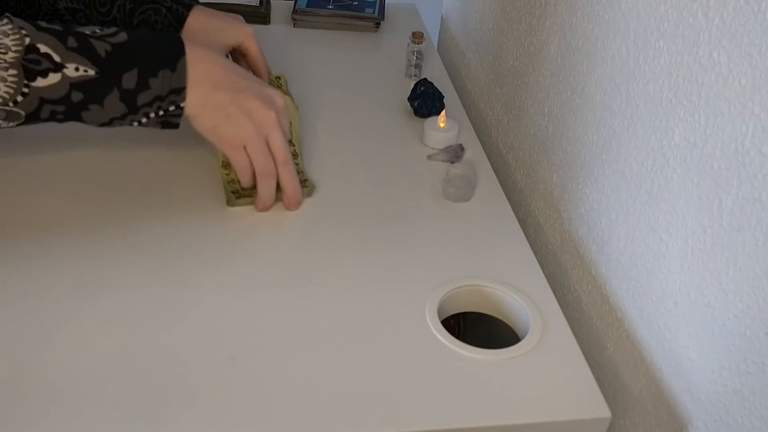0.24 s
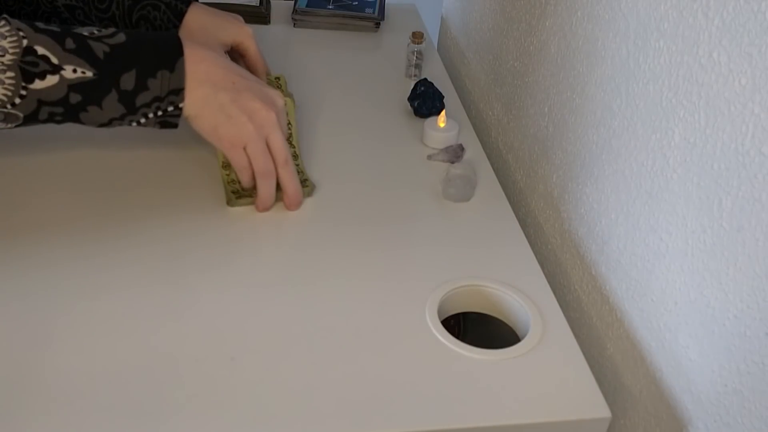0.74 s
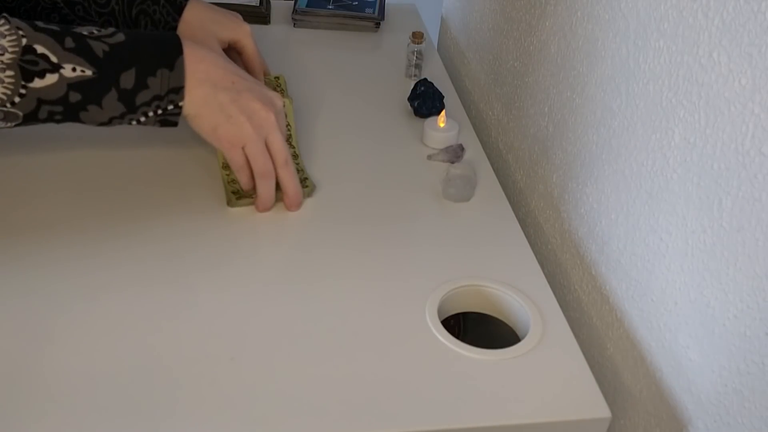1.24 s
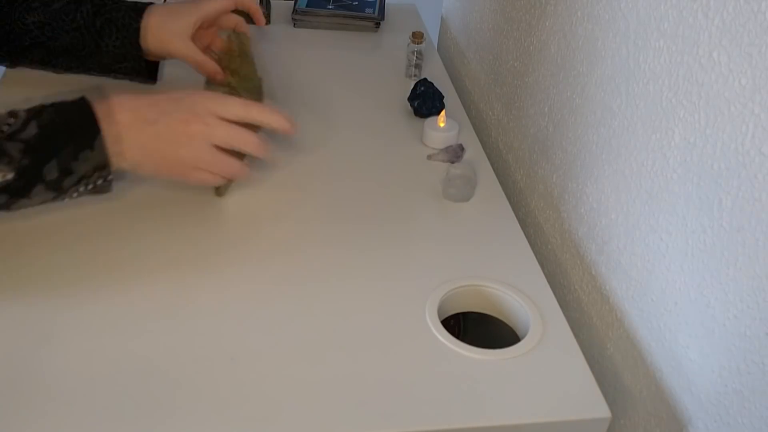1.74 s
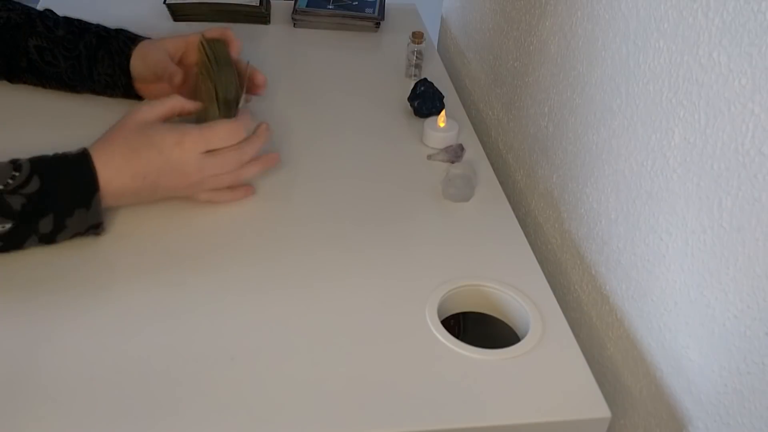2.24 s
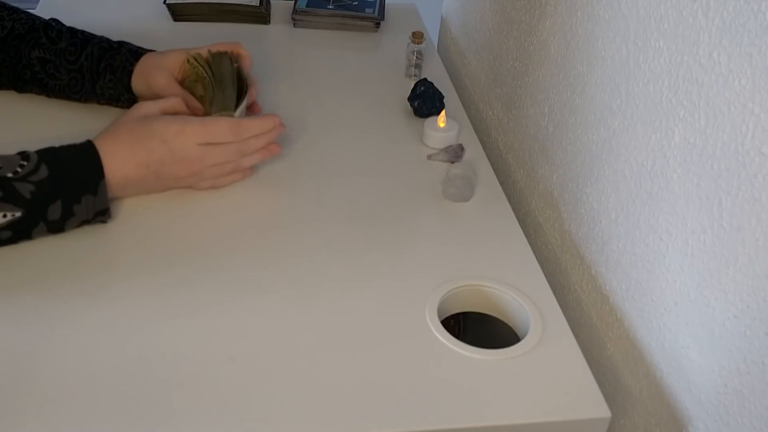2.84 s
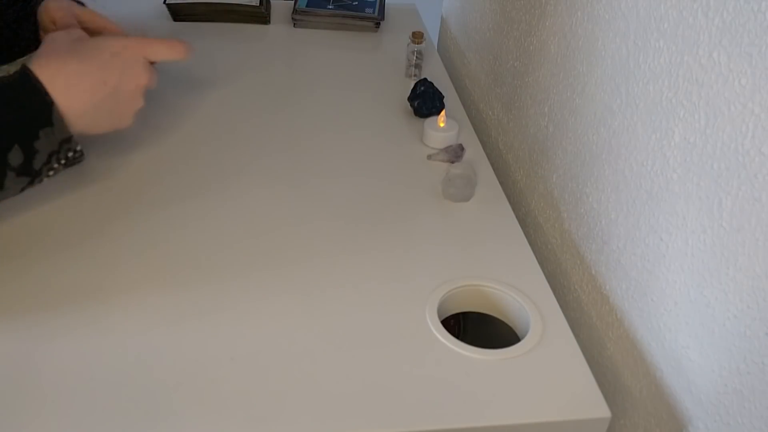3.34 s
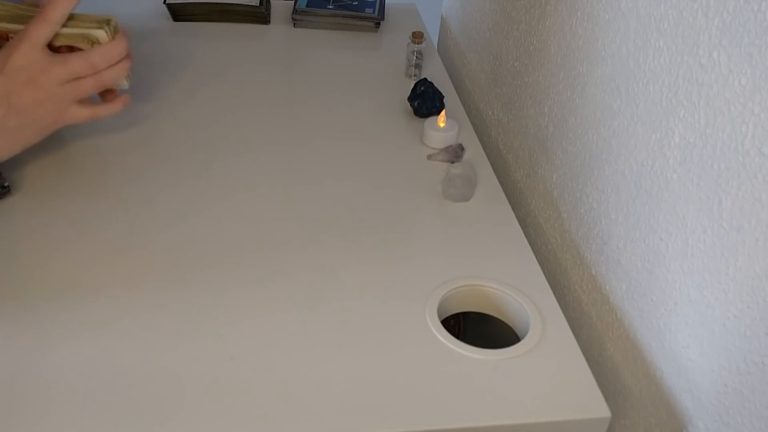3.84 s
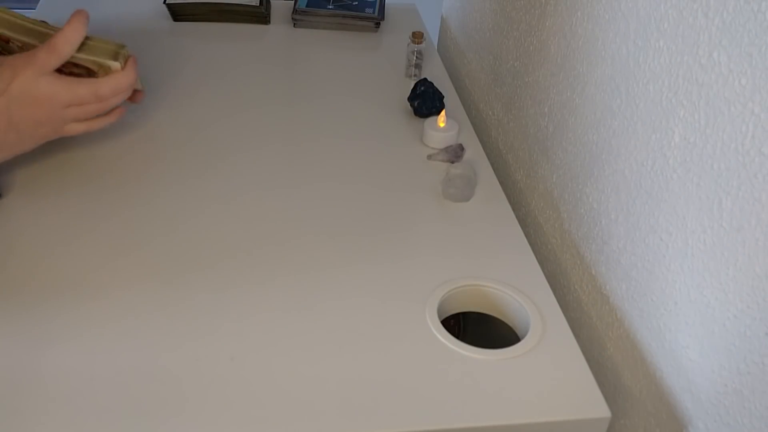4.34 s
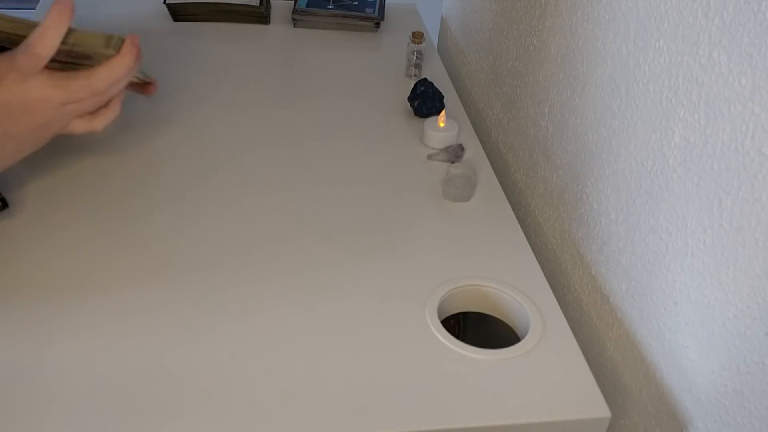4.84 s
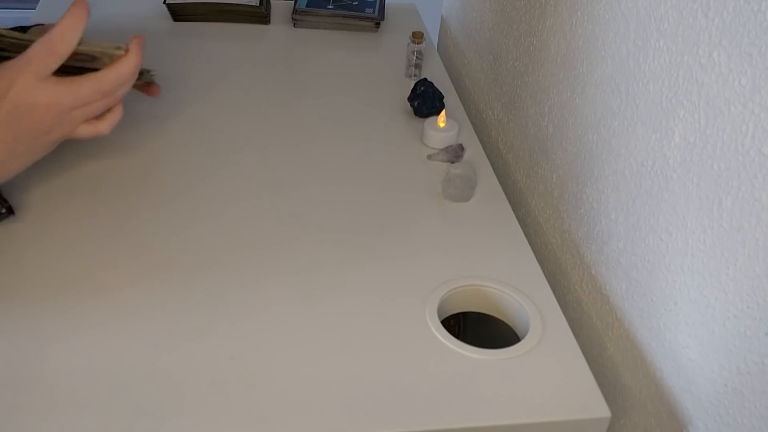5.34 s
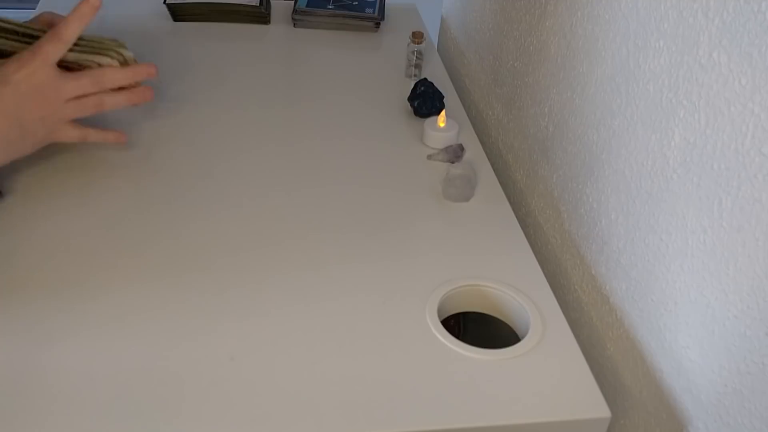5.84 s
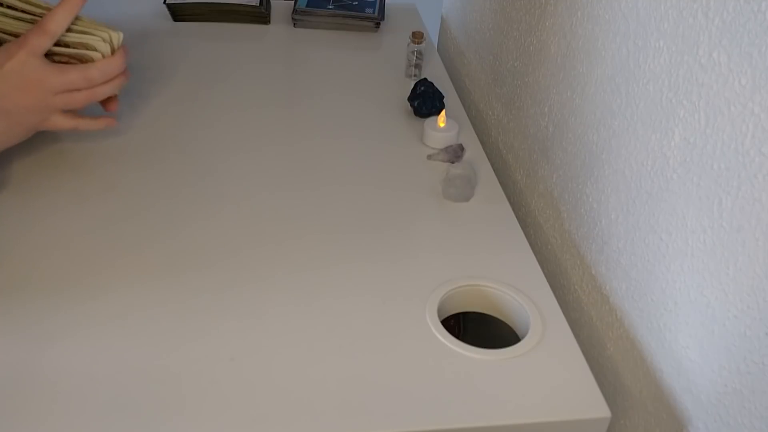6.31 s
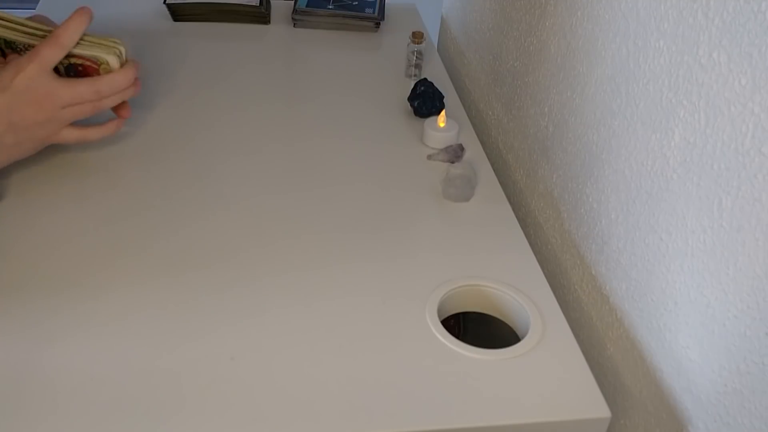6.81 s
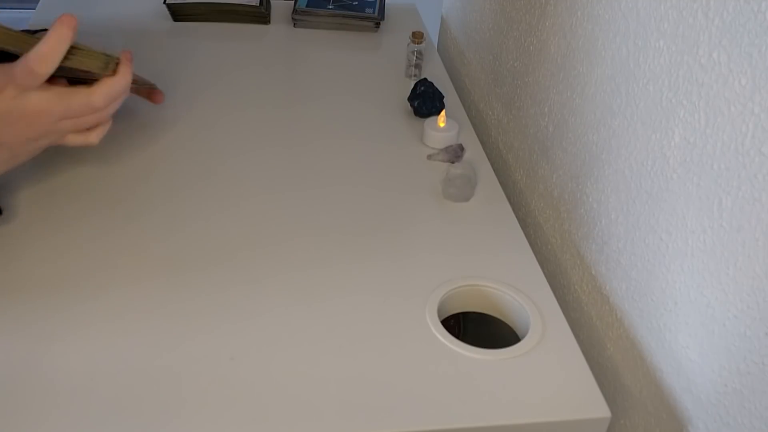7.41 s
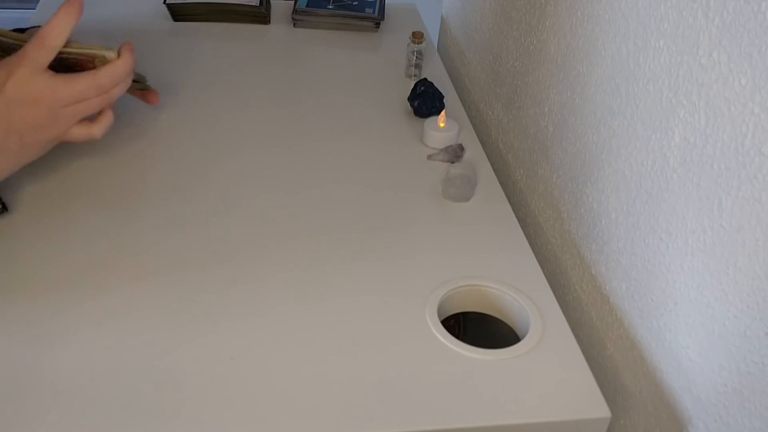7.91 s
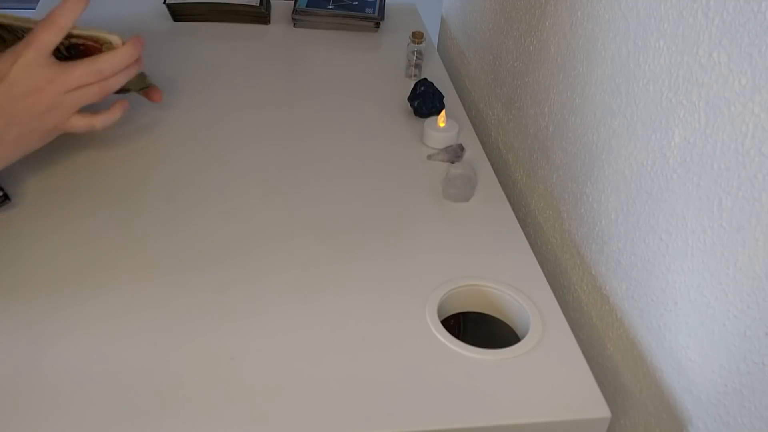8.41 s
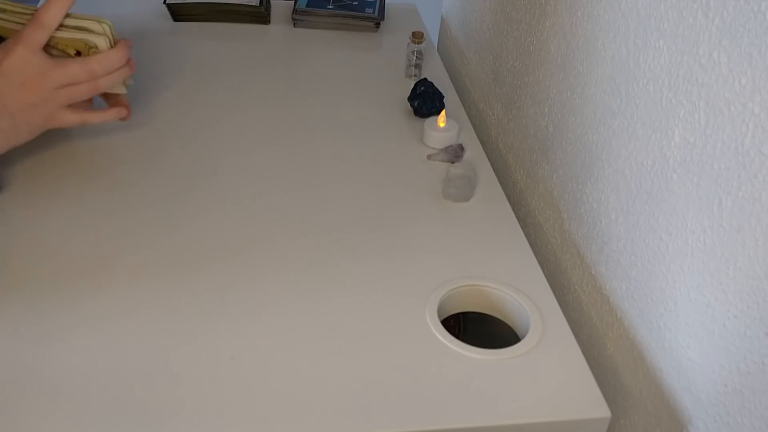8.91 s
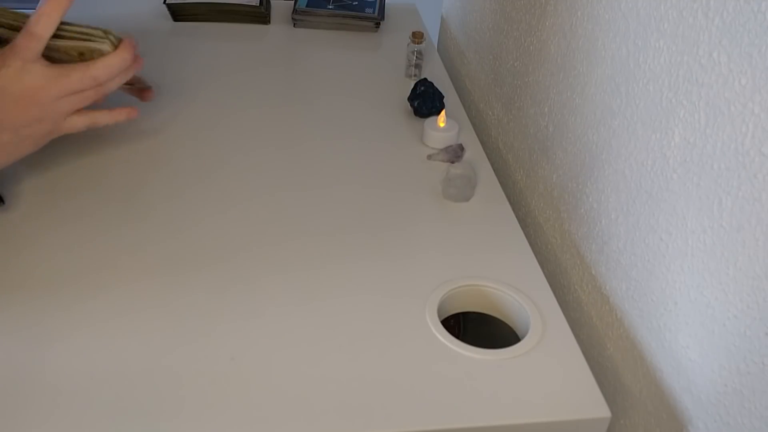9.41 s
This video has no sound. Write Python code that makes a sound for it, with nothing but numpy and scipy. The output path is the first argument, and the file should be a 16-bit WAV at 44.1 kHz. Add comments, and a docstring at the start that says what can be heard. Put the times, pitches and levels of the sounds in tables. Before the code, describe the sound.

Cards land hard on a desktop and snap off a thumb; edges knock and drag, then packets slide and slap in the hands.

```python
"""Shuffling a deck of cards

A deck lands on a desk in a small, quiet room, its cards flick off the thumb and its edge is knocked and
dragged square; it is then shuffled overhand, packets sliding out and slapping into the other hand.
Impacts are shaped noise bursts (snap, clap, thump), slides are modulated friction noise and drags are
stick-slip pulse trains. Desk modes and diffuse reflections surround them, over rumble, hum and hiss."""
import sys
import numpy as np
from scipy import signal
from scipy.fft import rfft, irfft
from scipy.io import wavfile
from scipy.ndimage import uniform_filter1d

SR = 44100
rng = np.random.default_rng(int(sys.argv[2]) if len(sys.argv) > 2 else 0)


def log_audio(samples):
    """Write samples as a 16-bit WAV file to the path given in sys.argv[1]."""
    # one column per channel
    frames = np.atleast_2d(samples).T
    # limit to full scale, then quantise
    limited = np.clip(frames, -1, 1)
    pcm = np.round(limited * 32767).astype(np.int16)
    wavfile.write(sys.argv[1], SR, pcm)


N = 426006
TIME = np.arange(N) / SR

# Cards flicking off the thumb onto the pile:
# (time [s], clap level before gain [dB], edge snap re clap [dB], contact time scale [ms])
FLICKS = [(0.3264,-14,3.5,1.7), (0.4745,-22.5,1.5,1.8), (.4916,-26.5,9.5,0.92), (0.511,-27.5,1,1.3),
          (0.5277,-25.5,5,2.6), (0.5648,-25.5,5.5,2.2), (.596,-30,6,2.4), (0.6033,-20,9.5,4),
          (0.6107,-20,3,2.2), (0.6202,-21.5,3.5,1.9), (0.6401,-26,4.5,4.5), (0.717,-18,-3,3.6),
          (0.7699,-17.5,-3.5,2.5), (0.7858,-15.5,1.5,6.8), (0.8008,-21,3.5,0.55), (0.8779,-19.5,-3,2.7),
          (0.8818,-28.5,10,7.6), (.9,-23,-3.5,2), (0.9115,-16,-8.5,3.7), (1.0025,-19.5,1.5,3),
          (1.0223,-26.5,-1.5,9.8), (1.0308,-25,9.5,2.9), (1.046,-23.5,4.5,3.7), (1.0622,-21.5,2,3.2),
          (1.1196,-22.5,4.5,4.2), (1.1281,-21,2.5,2.8), (1.2464,-20.5,0.5,5.8), (1.267,-20.5,7.5,5),
          (1.3652,-16.5,4.5,5.2), (1.3842,-24,5.5,2.8), (1.4049,-19.5,4,4.7), (1.4118,-24,8,2.7),
          (1.5111,-26.5,6,3.2), (1.5298,-18,8,1.8), (1.5385,-19.5,3,2.7)]
# Overhand strokes, a packet slapping into the hand, sliding, and its last card springing free:
# (slap time [s], release time [s], lead of first touch [ms], slap level before gain [dB],
#  air thump re slap clap [dB], slide level before gain [dB], release level before gain [dB],
#  release snap re clap [dB])
STROKES = [(4.743,4.842,1.1,-26,-10,-47.5,-32.5,3.5), (4.999,5.1023,3,-24,-11,-46,-29,-4.5),
           (5.301,5.376,15.8,-34,-0.5,-47.5,-24.5,-1.5), (5.58,5.6674,7.2,-33.5,6.5,-46.5,-35.5,-15),
           (7.313,7.4633,5.9,-21.5,-8.5,-45.5,-34,-20), (7.619,7.7108,12.4,-28.5,-4,-44,-26.5,0),
           (7.9257,8.0144,19,-36.5,-1.5,-47.5,-31.5,0.5), (8.2284,8.3108,6.5,-30,0.5,-45.5,-34,8.5),
           (8.52,8.584,12.5,-37.5,-1,-46,-48,-2), (9.523,9.6407,0.96,-27,0,-50,-29,-4.5)]
SETTLE_S = 0.017  # from the release until the freed packet falls against the others
# Spectrum of card faces rubbing: (frequency [Hz], relative level [dB])
SLIDE_TONE = [(59, -30.5), (100, -11.5), (322, 2), (442, -5), (1130, -2.5), (1520, 1), (2630, -8.5),
              (6840, -12.5), (11400, -15), (16000, -25)]


def undb(db):
    """An amplitude ratio is ten to the power of its level in decibels over twenty."""
    return 10 ** (np.asarray(db) / 20)


def unit(x):
    """Normalise a transient to unit energy, the sum of its squares."""
    return x / np.sqrt(np.sum(x ** 2) + 1e-18)


def steady(x):
    """Normalise a fluctuating signal by its standard deviation."""
    return x / np.std(x)


def add(out, s, x):
    """Superpose x on out from time s [s], in place."""
    i = int(np.clip(s * SR, 0, N - 1))
    out[i:i + len(x)] += x[:N - i]


def at_hz(points, hz):
    """Interpolate a tabulated curve linearly in log frequency."""
    f, v = np.transpose(points)
    return np.interp(np.log(np.maximum(hz, 1)), np.log(f), v)


def colour(x, tone, size=2048):
    """Minimum-phase filtering: folding the cepstrum makes the response to a spectrum causal."""
    log_gain = np.log(undb(at_hz(tone, np.fft.rfftfreq(size, 1 / SR))))
    cepstrum = irfft(log_gain)
    cepstrum[1:size // 2] *= 2
    cepstrum[size // 2 + 1:] = 0
    response = unit(irfft(np.exp(rfft(cepstrum))))
    return signal.fftconvolve(x, response)[:len(x)]


def band(x, lo_hz, hi_hz, order=2):
    """Butterworth band-pass: maximally flat between its corner frequencies."""
    corners = [lo_hz, min(hi_hz, .45 * SR)]
    return signal.sosfilt(signal.butter(order, corners, "band", fs=SR, output="sos"), x)


def waver(rate):
    """Random finger pressure: Gaussian values, rate per second, joined by straight lines; spread near 1."""
    return 1.2 * np.interp(TIME * rate, np.arange(8000), rng.standard_normal(8000))


def friction(rate, spread_db, smooth):
    """Dry friction: fibres catch and let go in tiny clicks of uneven size, over a smooth hiss."""
    sizes = undb(spread_db * np.minimum(rng.standard_exponential(N), 4))
    catches = (rng.random(N) < rate / SR) * sizes * rng.choice([-1, 1], N)
    return steady(steady(catches) + smooth * rng.standard_normal(N))


def air(hum_hz, hum_db):
    """Stationary background: low room rumble and microphone hiss as shaped noise, a faint hum as a sine."""
    # Background spectrum: (frequency [Hz], relative level [dB])
    air_tone = [(12, -34), (20, 1.5), (120, -16.5), (472, -28.5), (558, -25), (849, -32.5), (1090, -29),
                (1220, -34.5), (1440, -34), (16000, -39)]
    noise = steady(colour(rng.standard_normal(N), air_tone, size=8192))
    hum = np.sin(2 * np.pi * hum_hz * TIME)
    return undb(-54) * noise + undb(hum_db) * hum


def blow(tone, snap_db, thump_db, ms, clap_s, thump_s, flutter, crisp, count=3000):
    """Impact in three bands: edges snap in a brief contact, the pack claps and flutters, trapped air thumps."""
    t = TIME[:count]
    edge_noise, pack_noise, air_noise = rng.standard_normal((3, count))
    u = t / (max(ms, .3) / 1000)
    contact = np.sqrt(u) * np.exp(-(crisp * u) ** 2)
    # loose cards tick against each other just after the contact
    loose = (rng.random(count) < 900 / SR) * edge_noise * np.exp(-t / .014)
    edges = edge_noise * contact + .5 * loose
    pack = pack_noise * (contact + flutter * np.exp(-t / clap_s))
    trapped_air = air_noise * np.exp(-t / thump_s)
    snap = band(colour(edges, tone), 2500, 19000)
    clap = band(colour(pack, tone), 400, 2500)
    thump = band(colour(trapped_air, tone), 30, 400)
    return unit(clap) + undb(snap_db) * unit(snap) + undb(thump_db) * unit(thump)


def blows(rows, tone, gain_db, echo_db, clap_s, thump_s, flutter, crisp):
    """Early reflection: desk and wall return each blow, with two delays drawn anew every time."""
    out = np.zeros(N)
    # rows: (time [s], clap level before gain [dB], snap re clap [dB], thump re clap [dB], contact [ms])
    for s, db, snap_db, thump_db, ms in rows:
        sound = undb(db + gain_db) * blow(tone, snap_db, thump_db, ms, clap_s, thump_s, flutter, crisp)
        add(out, s, sound)
        for delay in rng.uniform([.003, .007], [.007, .012]):
            add(out, s + delay, undb(echo_db) * sound)
    return out


def landing():
    """Flat impact: the deck meets the desk in two close blows and presses out the air below."""
    # Blows of the landing: (time [s], clap level before gain [dB], edge snap re clap [dB],
    # air thump re clap [dB], contact time scale [ms])
    landing_rows = [(.2875,-0.5,-9.5,-13.5,2.7), (.2907,-13,-21.5,-7.5,2.6)]
    # Spectrum of the landing: (frequency [Hz], relative level [dB])
    landing_tone = [(60,-13), (200,-12), (400,-0.5), (700,-5.5), (1050,-0.5), (1600,-6), (2300,-14.5),
                    (2900,-6), (4000,-19.5), (8000,-23.5), (16000,-40)]
    return blows(landing_rows, landing_tone, gain_db=20, echo_db=-22, clap_s=0.0076, thump_s=0.0066,
                 flutter=.25, crisp=0.83)


def desk(force):
    """Modal synthesis: the force is convolved with a sum of decaying sines, the modes of the desk top."""
    # Modes of the desk top: (frequency [Hz], relative level [dB], 60 dB decay time [s])
    desk_modes = [(96.7, -12, 0.21), (490, -11.5, .1), (580, -9, 0.16), (752, -6, 0.2), (850, -12, 0.092),
                  (1058, 4.5, .16), (1420, -4.5, 0.088), (1860, -7, 0.031), (1975, 0.5, 0.083),
                  (2890, -7, .04)]
    t = TIME[:SR // 2]
    ring = np.zeros(len(t))
    for hz, db, t60 in desk_modes:
        ring += undb(db) * np.sin(2 * np.pi * hz * t) * np.exp(-np.log(1000) * t / t60)
    return signal.fftconvolve(force, unit(ring))[:N]


def reflections(wet_db, build_s):
    """Diffuse reverberation: noise builds up, then decays exponentially at a rate set by frequency."""
    # Room decay: (frequency [Hz], 60 dB decay time [s])
    room_t60 = [(100, 0.68), (700, 0.2), (2000, 0.25), (6000, 0.22), (15000, 0.23)]
    # Spectrum of the reflections: (frequency [Hz], relative level [dB])
    room_tone = [(60, -5.5), (200, -7.5), (600, 5), (1500, -0.5), (4000, 0), (9000, -4), (16000, -1.5)]
    t = TIME[:SR // 2]
    noise = rfft(rng.standard_normal(len(t)))
    hz = np.fft.rfftfreq(len(t), 1 / SR)
    tail = 0
    for k, (_, t60) in enumerate(room_t60):
        # overlapping bands, each full at its own frequency and zero at its neighbours'
        share = at_hz([(f, j == k) for j, (f, _) in enumerate(room_t60)], hz)
        tail = tail + irfft(noise * share, len(t)) * np.exp(-np.log(1000) * t / t60)
    build_up = 1 - np.exp(-(t / build_s) ** 2)
    return undb(wet_db) * unit(colour(tail * build_up, room_tone))


def room(x, wet_db, build_s, count=4):
    """Changing reflections: hands move, so successive short slices of sound take different random tails."""
    turn = np.arange(N) // 600 % count
    wet = 0
    for k in range(count):
        slices = uniform_filter1d(1. * (turn == k), size=64)
        wet = wet + signal.oaconvolve(x * slices, reflections(wet_db, build_s))[:N]
    return x + wet


def handling(patchy_db, fidget_db):
    """Modulated friction: patchy rustle swells as cards peel off the thumb, later as fingers move on the deck."""
    peel_s, peel_db = 0.025, -31.5  # length before each flick; level relative to its clap before gain
    rustle = steady(colour(friction(rate=1200, spread_db=3, smooth=.8), SLIDE_TONE))
    peeling = np.zeros(N)
    for s, db, _, _ in FLICKS:
        add(peeling, s - peel_s, undb(db + peel_db) * np.linspace(0, 2, int(peel_s * SR)) ** 2)
    # fingers never rest on the lifted deck, from 3.1 s on
    holding = undb(-78.5 + fidget_db * waver(4.4)) * (TIME > 3.1)
    return rustle * undb(patchy_db * np.tanh(waver(33))) * (peeling + holding)


def flick_blows():
    """Air cushion: every flick squeezes out about the same thump, however hard; a weaker card trails it."""
    cushion_db = -24.5  # thump level before gain
    straggler_db, straggler_s = -14, .014  # level relative to the flick; longest delay
    for (s, db, snap_db, ms), late in zip(FLICKS, rng.uniform(.2, 1, len(FLICKS))):
        yield s, db, snap_db, cushion_db - db, ms
        yield s + late * straggler_s, db + straggler_db, 0, 0, ms


def flicks():
    """Impact of light plates: single cards strike the pile with strong edge snaps."""
    # Spectrum of the flicks: (frequency [Hz], relative level [dB])
    flick_tone = [(35,-25), (90,4.5), (170,-9), (300,-4), (600,-5), (1100,-4), (1700,-5.5), (2300,-10),
                  (2900,-5), (3900,-13), (5500,-9), (11000,-13.5), (16000,-23)]
    return blows(flick_blows(), flick_tone, gain_db=21, echo_db=-15.5, clap_s=0.011, thump_s=0.0044,
                 flutter=0.33, crisp=1.3)


def knock_blows():
    """Level-dependent spectrum: light knocks are mostly thump, hard ones mostly clap."""
    # Deck edge knocking on the desk:
    # (time [s], clap level before gain [dB], edge snap re clap [dB])
    knock_rows = [(.4393,-38,-8), (1.2157,-35.5,-1), (1.622,-38,-15.5), (1.8544,-44.5,-20),
                  (1.9681,-35,-12.5), (1.9946,-31,-24), (2.033,-20.5,3.5), (2.063,-24.5,-21),
                  (2.0894,-17.5,-9.5), (2.11,-8.5,-4), (2.217,-27,-34), (2.2416,-35,-27.5), (2.272,-26,-26),
                  (2.4717,-24,-16.5), (2.6222,-10,-1), (2.675,-21.5,-7), (2.753,-22.5,-11),
                  (2.7913,-11,-7.5), (3.0229,-30,0), (3.042,-33,-2.5)]
    thump_at_0_db, thump_growth = -25, 0.2  # thump of a 0 dB clap [dB]; its rise per dB of clap
    for s, db, snap_db in knock_rows:
        thump_db = thump_at_0_db + thump_growth * db
        yield s, db, snap_db, thump_db - db, 3.2


def knocks():
    """Edge impact: the deck strikes the desk, with a long thump and strong flutter."""
    # Spectrum of the knocks: (frequency [Hz], relative level [dB])
    knock_tone = [(50,-25), (90,-9.5), (170,-15.5), (400,-7.5), (750,-4.5), (1050,-0.5), (1500,-2.5),
                  (2100,-9.5), (3200,-17), (4300,-20.5), (5500,-27.5), (10000,-36.5), (16000,-53)]
    return blows(knock_blows(), knock_tone, gain_db=21.5, echo_db=-20, clap_s=0.0063, thump_s=0.027,
                 flutter=0.72, crisp=0.72)


def drags(gain_db, jitter, scatter_db, hiss, count=120):
    """Stick-slip: card edges judder over the desk in nearly regular pulses, with a little hiss between."""
    # Card edges dragged over the desk:
    # (start [s], length [s], level before gain [dB], nominal slip rate [1/s])
    drag_rows = [(1.821,0.034,-50.5,94), (1.907,0.025,-48,130), (1.986,0.044,-44,126),
                 (2.047,0.093,-34.5,270), (2.194,0.23,-48,160), (2.426,0.049,-27,270),
                 (2.567,0.062,-26,250), (2.646,.05,-36,270), (2.736,0.022,-22.5,330), (2.761,0.032,-30,270),
                 (3.014,0.023,-35,310)]
    # Spectrum of the drags: (frequency [Hz], relative level [dB])
    drag_tone = [(100,-25), (400,-17.5), (700,-1.5), (1000,-5), (1400,-5), (2100,-10.5), (2800,-28),
                 (5000,-30), (15000,-48)]
    rise_db = 6.5  # the hand presses harder along a drag
    out = np.zeros(N)
    for start, length, db, rate in drag_rows:
        gaps, sizes = rng.standard_normal((2, count))
        force = hiss * rng.standard_normal(SR // 2)
        slip_s = np.cumsum(np.exp(jitter * gaps) / rate)
        where = (slip_s * SR).astype(int)
        inside = where < len(force)
        force[where[inside]] += undb(scatter_db * sizes[inside])
        force = steady(force[:max(int(length * SR), 256)])
        press_db = rise_db * np.linspace(-.5, .5, len(force))
        add(out, start, force * undb(gain_db + db + press_db))
    return colour(out, drag_tone)


def sliding(fade_s):
    """Friction grows with speed: even gain through a stroke, swelling and stopping in a slow slide."""
    # Card faces drawn over each other in slow slides, mostly outside the strokes:
    # (start [s], length [s], peak level before smoothing and gain [dB])
    slide_rows = [(2.17,0.16,-47), (2.276,0.15,-44), (2.962,0.11,-46.5), (3.04,0.25,-53), (3.364,0.2,-58),
                  (3.874,0.044,-58), (3.956,.11,-62.5), (4.324,0.25,-48.5), (4.644,0.091,-42.5),
                  (5.825,.12,-59.5), (6.184,0.23,-53), (6.432,0.16,-59), (6.712,0.066,-68.5),
                  (6.973,.22,-51), (8.761,0.17,-58), (8.891,0.13,-55.5), (9.06,.15,-60), (9.206,0.19,-44),
                  (9.586,0.082,-43)]
    peak_share, power = 0.7, 0.99  # share of the slide spent gathering speed; gain per speed exponent
    gain = np.zeros(N)
    for s, release_s, lead_ms, _, _, db, _, _ in STROKES:
        touch_s = s - lead_ms / 1000
        length = max(release_s + SETTLE_S - touch_s, 0)
        add(gain, touch_s, np.full(int(length * SR), undb(db)))
    for s, length, db in slide_rows:
        along = np.linspace(0, 1, int(length * SR))
        speed = np.interp(along, [0, min(peak_share, 1), 1], [0, 1, 0])
        add(gain, s, undb(db) * speed ** power)
    return uniform_filter1d(gain, max(int(fade_s * SR), 1))


def slides(hiss_db, rub_db):
    """Sliding friction in two bands: card faces hiss unevenly, the packet in the hand rubs lower."""
    grain = colour(friction(rate=1200, spread_db=4.0, smooth=1.2), SLIDE_TONE)
    hiss = steady(band(grain, 2500, 19000))
    rub = steady(band(grain, 120, 2500))
    uneven_hiss = undb(hiss_db + 2.9 * waver(86)) * hiss
    uneven_rub = undb(rub_db + 5.2 * waver(90)) * rub
    return (uneven_hiss + uneven_rub) * sliding(fade_s=.009)


def hand_blows():
    """Impact sequence: every stroke goes grip, touch, slap, release, settle; single taps are added."""
    # Packets tapping together as the deck is regripped:
    # (time [s], clap level before gain [dB], edge snap re clap [dB], air thump re clap [dB])
    tap_rows = [(3.1424,-35,1,-9), (3.5264,-39.5,4,7), (4.0828,-61,6,5), (4.1022,-55.5,4,8.5),
                (4.4717,-49,1,4), (4.52,-34.5,-7,-6), (4.6419,-29.5,-3,-22), (5.075,-35,4.5,1),
                (5.4356,-36,-15,1), (6.2687,-54.5,8.5,16), (7.086,-44.5,4,-13), (7.1587,-38.5,-3.5,1.5),
                (7.381,-35,-3,5), (8.588,-35.5,0,5.5), (9.604,-35.5,4,-5)]
    touch_snap_db, release_thump_db = 3, -8.5  # relative to their claps
    for s, release_s, lead_ms, db, thump_db, _, release_db, snap_db in STROKES:
        # the thumb ticks on the deck, then the leading card touches the hand
        yield s - .073, -60, touch_snap_db, release_thump_db, 2.8
        yield s - lead_ms / 1000, db - 7.5, touch_snap_db, thump_db, 1.5
        yield s, db, 0.5, thump_db, 1.42
        # the last card springs free, then the freed packet falls against the others
        yield release_s, release_db, snap_db, release_thump_db, 2.2
        yield release_s + SETTLE_S, release_db - 5.5, snap_db, release_thump_db, 2
    for tap in tap_rows:
        yield *tap, 1.85


def slaps():
    """Impact on a soft support: packets slap into the hand and their claps flutter on."""
    # Spectrum of the slaps: (frequency [Hz], relative level [dB])
    slap_tone = [(30,-6.5), (60,4), (150,-2.5), (330,-4), (600,-5), (1100,-5), (1800,-4), (3000,-9.5),
                 (4700,-5), (12000,-14), (16000,-20.5)]
    return blows(hand_blows(), slap_tone, gain_db=22.0, echo_db=-16.0, clap_s=0.018, thump_s=0.0048,
                 flutter=0.47, crisp=0.81)


def rasps(gain_db):
    """Band-limited noise: a band-pass around one pitch turns friction grain into a short pitched noise."""
    # Brief pitched noises, rasps and a squeak of fingers or cards, and one dull thud:
    # (time [s], level before gain [dB], centre frequency [Hz], length [s], half width re centre [ratio])
    rasp_rows = [(4.638,-35.5,1700,0.015,.25), (4.843,-42,3250,.035,0.066), (7.155,-39,1140,0.016,0.29),
                 (7.313,-28.5,1620,0.015,0.45), (8.584,-35,627,0.015,0.29), (8.904,-56,2500,0.051,.25),
                 (9.169,-58,1770,0.025,.15), (9.332,-35.5,1180,0.029,.3), (9.519,-28.5,1660,0.032,0.21)]
    out = np.zeros(N)
    grain = friction(rate=2000, spread_db=9.0, smooth=0.85)
    for s, db, hz, length, width in rasp_rows:
        swell = signal.windows.tukey(max(int(length * SR), 64), .5)
        spread = 1 + max(width, .02)
        noise = band(grain[int(s * SR):][:len(swell)], hz / spread, hz * spread)
        add(out, s, undb(db + gain_db) * steady(noise * swell))
    return out


def scene():
    """Superposition: desk work rings the top; the hands' reflections build up faster."""
    on_desk = landing() + flicks() + knocks() + drags(gain_db=-1, jitter=.16, scatter_db=1.5, hiss=0.05)
    in_hand = slaps() + slides(hiss_db=2, rub_db=0) + rasps(gain_db=-0.5)
    in_hand += handling(patchy_db=7.0, fidget_db=3)
    desk_sound = room(on_desk + undb(-21.5) * desk(on_desk), wet_db=-9.5, build_s=0.0037)
    hand_sound = room(in_hand, wet_db=-10.0, build_s=0.0012)
    return (desk_sound + hand_sound + air(hum_hz=99.0, hum_db=-65.0))[None]


def record(dry):
    """Limited range and bandwidth: the loudest peaks clip, then an elliptic low-pass cuts the top."""
    low_pass = signal.ellip(8, .2, 70, 16100, fs=SR, output="sos")
    return signal.sosfilt(low_pass, np.clip(dry, -1, 1))


dry = scene()
out = record(dry)
log_audio(out)
```